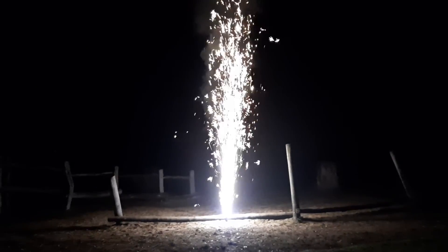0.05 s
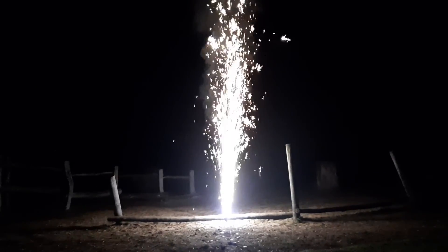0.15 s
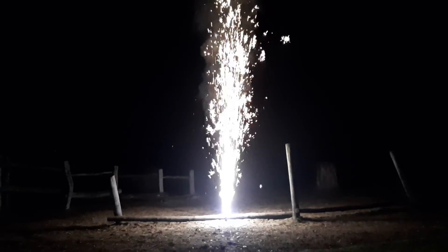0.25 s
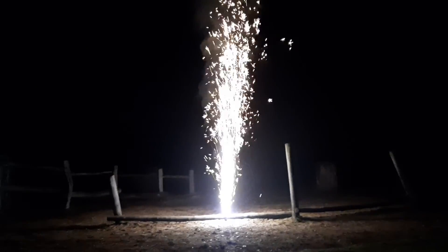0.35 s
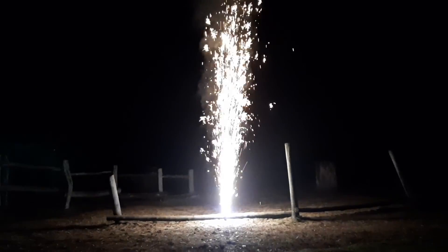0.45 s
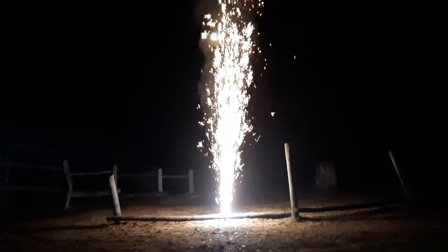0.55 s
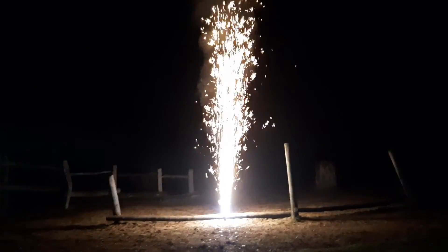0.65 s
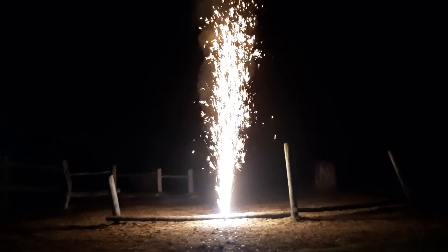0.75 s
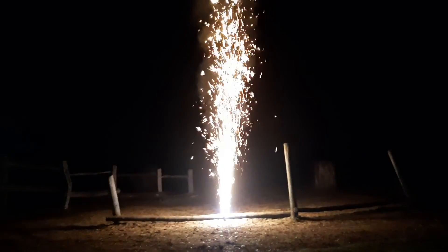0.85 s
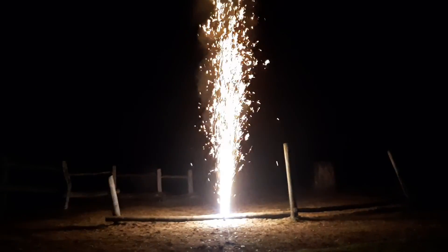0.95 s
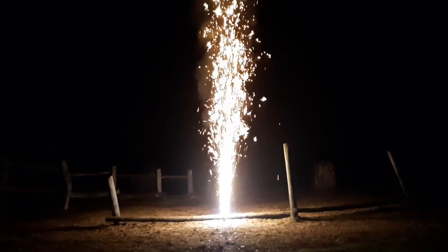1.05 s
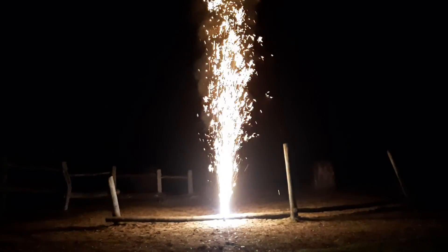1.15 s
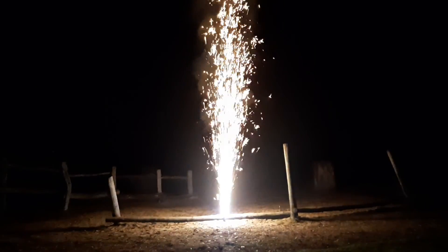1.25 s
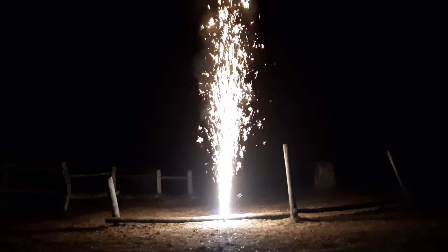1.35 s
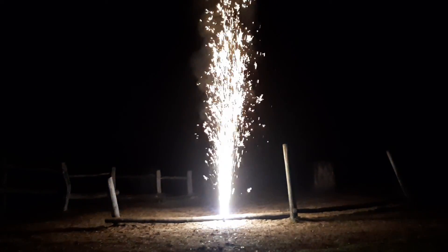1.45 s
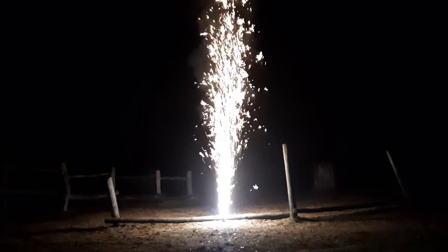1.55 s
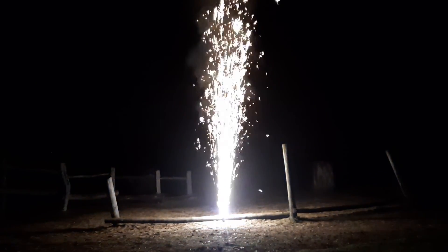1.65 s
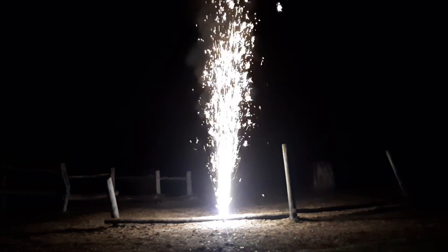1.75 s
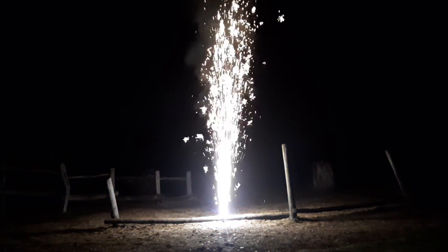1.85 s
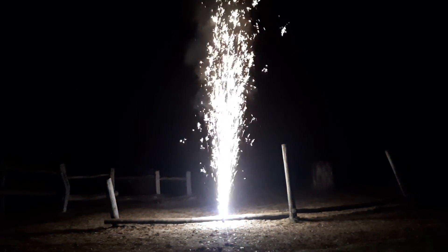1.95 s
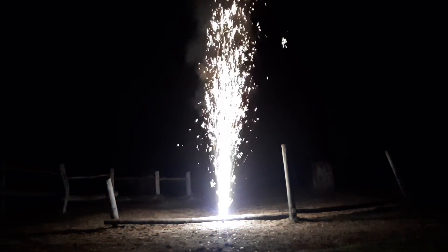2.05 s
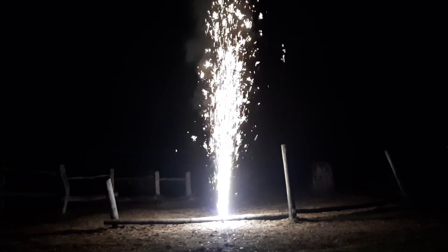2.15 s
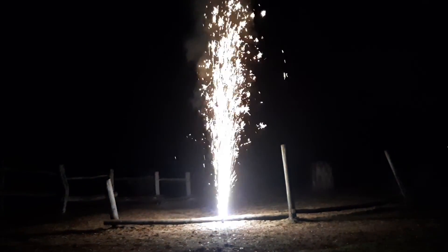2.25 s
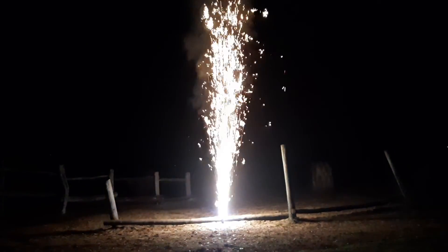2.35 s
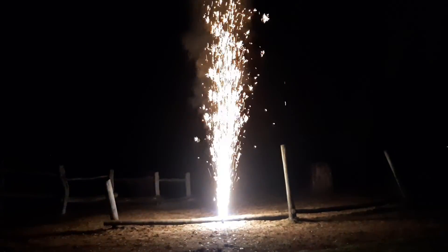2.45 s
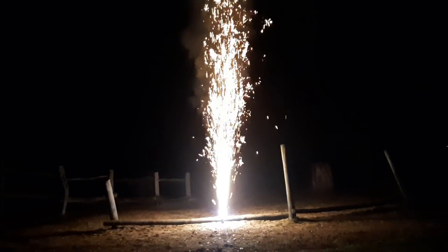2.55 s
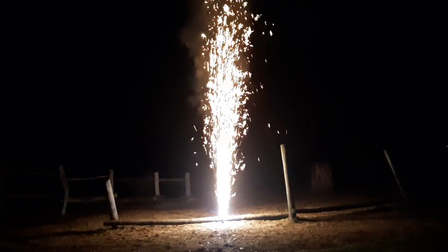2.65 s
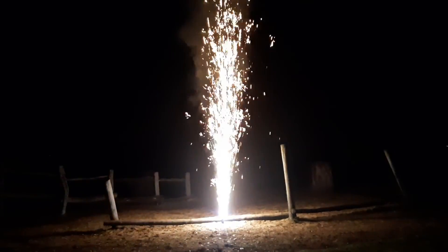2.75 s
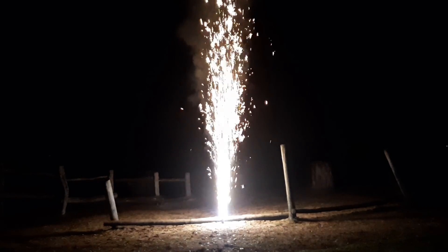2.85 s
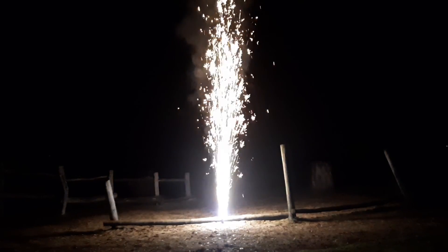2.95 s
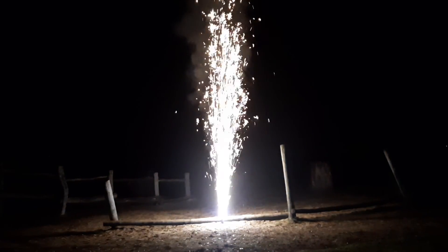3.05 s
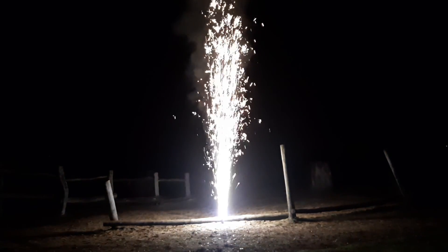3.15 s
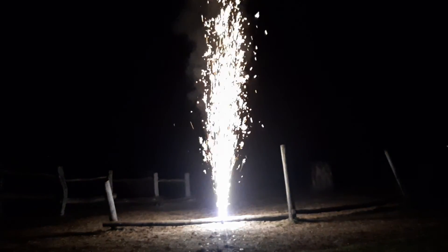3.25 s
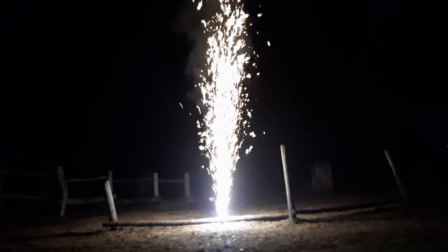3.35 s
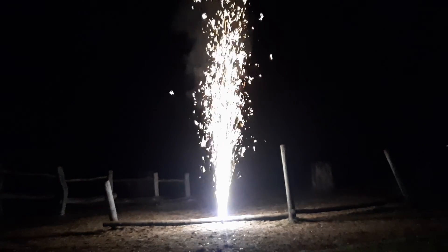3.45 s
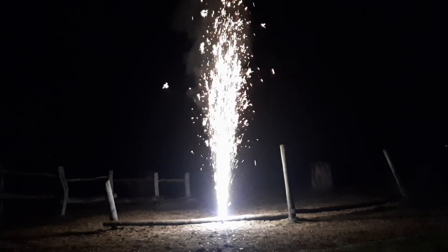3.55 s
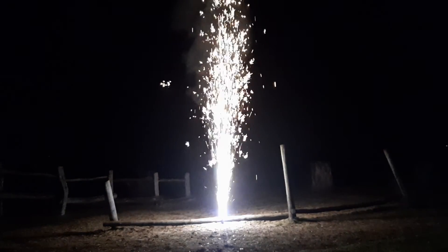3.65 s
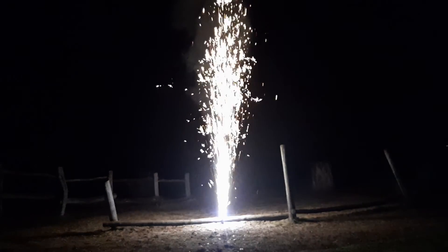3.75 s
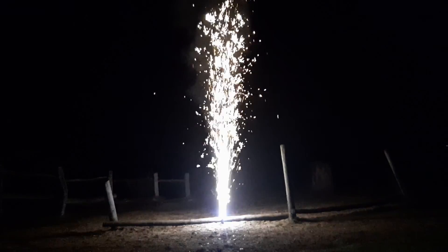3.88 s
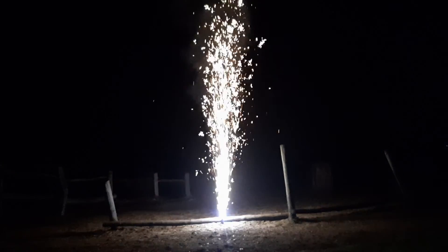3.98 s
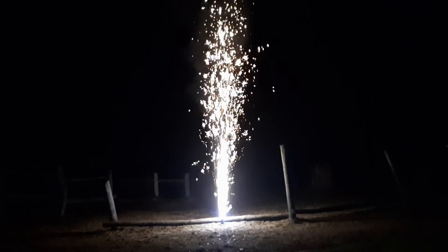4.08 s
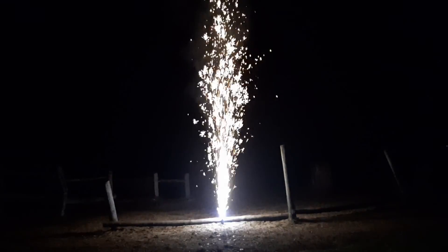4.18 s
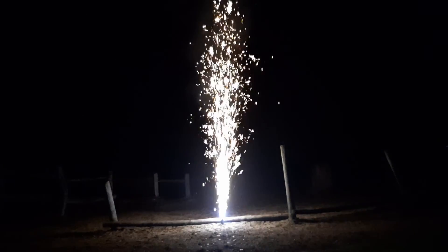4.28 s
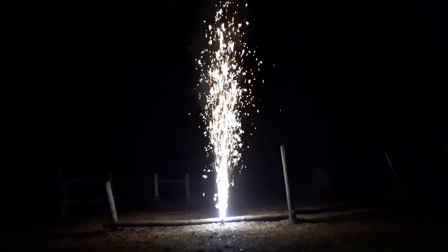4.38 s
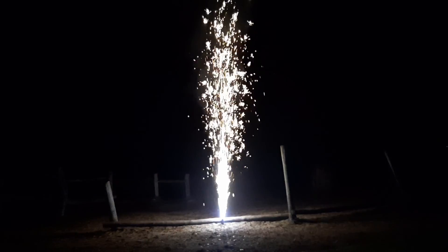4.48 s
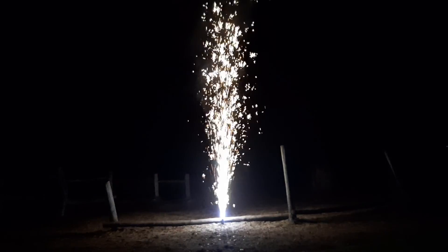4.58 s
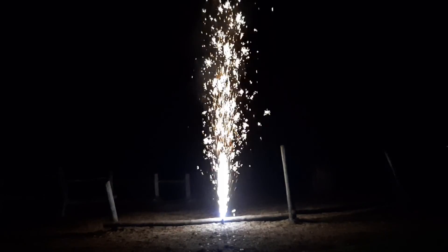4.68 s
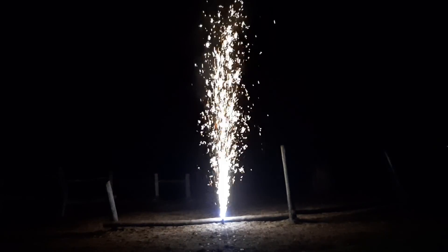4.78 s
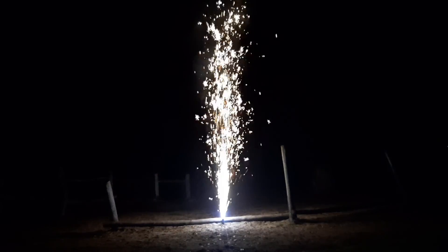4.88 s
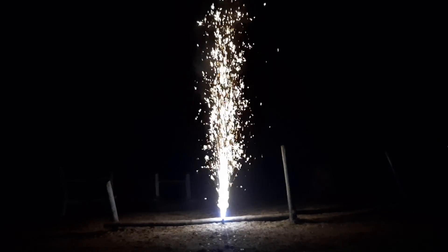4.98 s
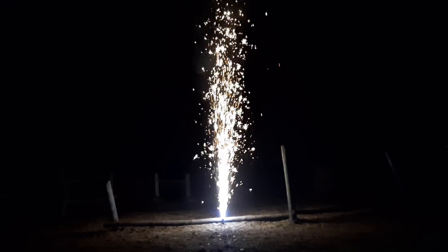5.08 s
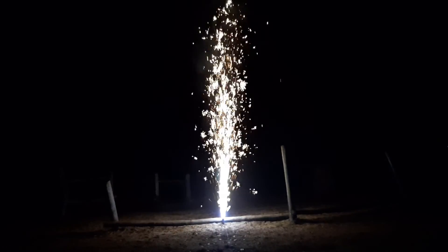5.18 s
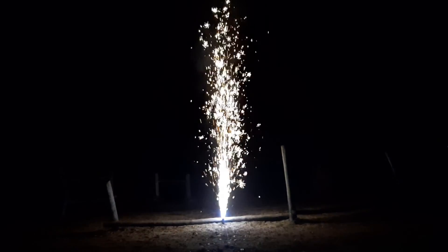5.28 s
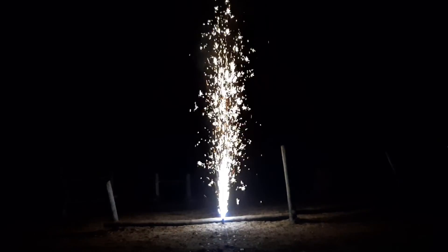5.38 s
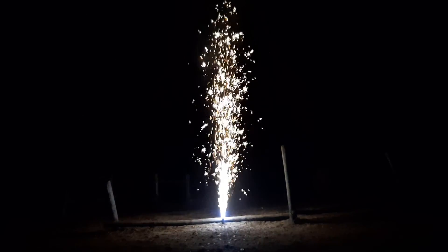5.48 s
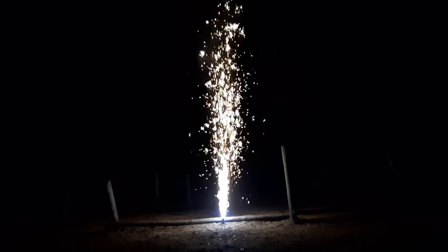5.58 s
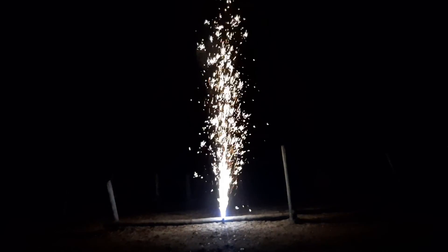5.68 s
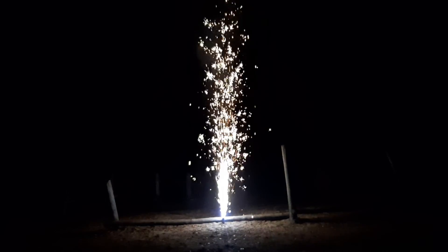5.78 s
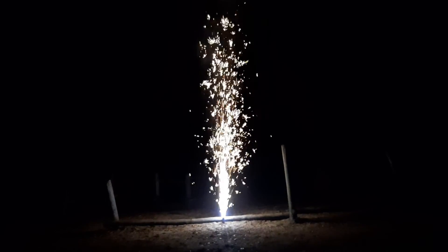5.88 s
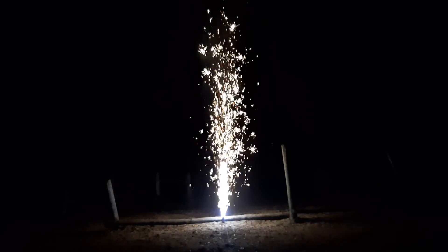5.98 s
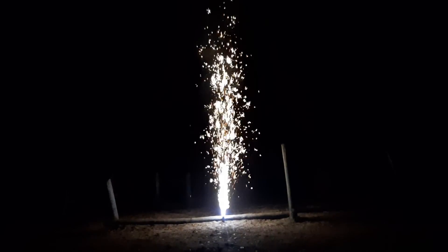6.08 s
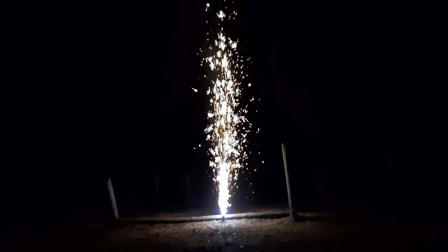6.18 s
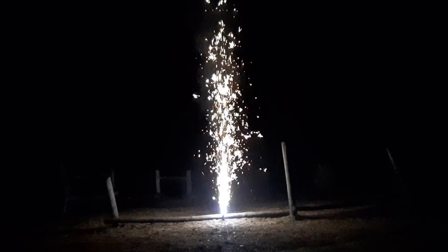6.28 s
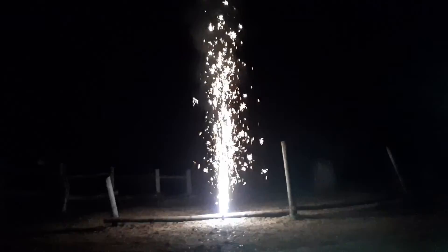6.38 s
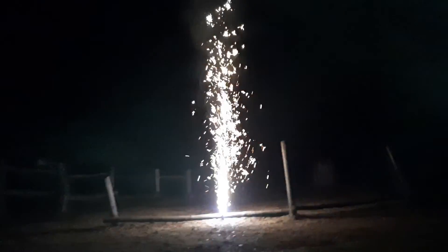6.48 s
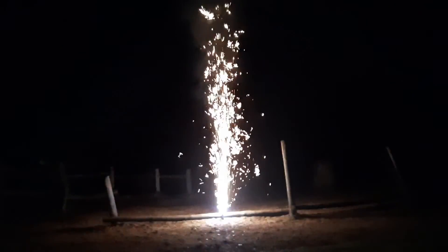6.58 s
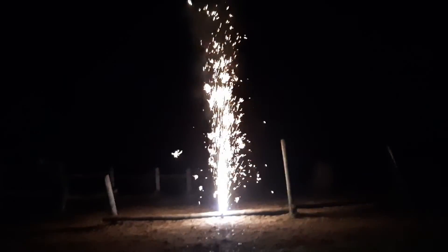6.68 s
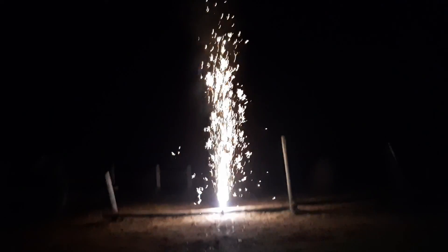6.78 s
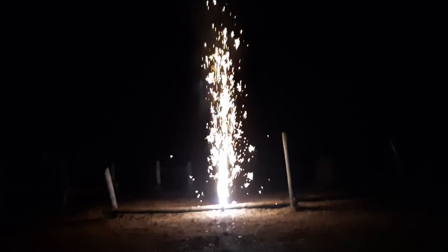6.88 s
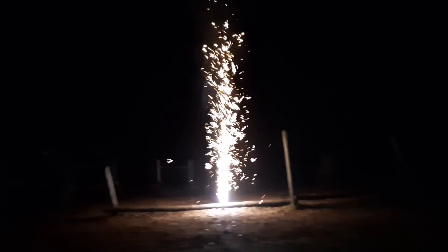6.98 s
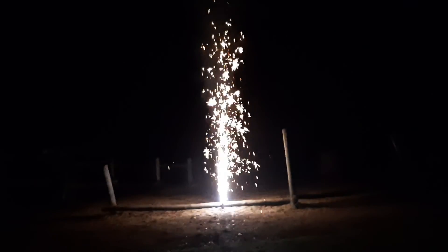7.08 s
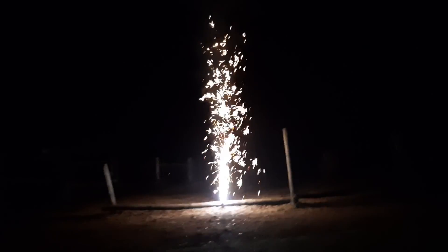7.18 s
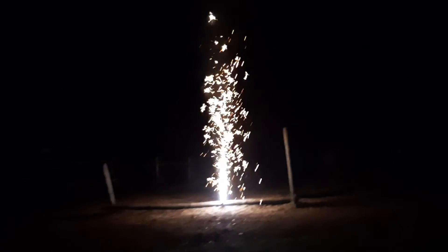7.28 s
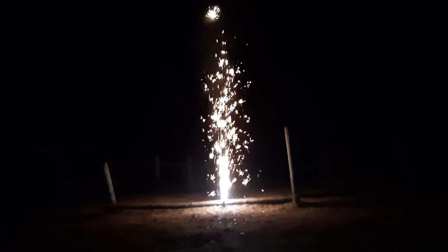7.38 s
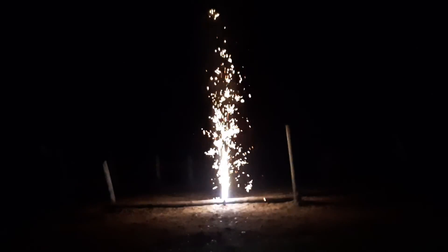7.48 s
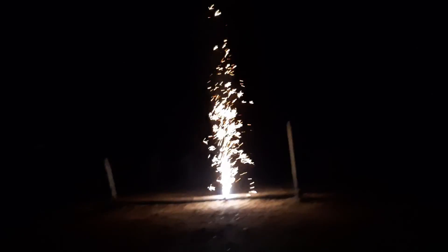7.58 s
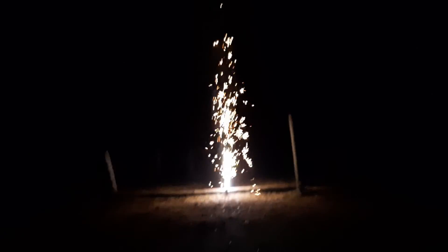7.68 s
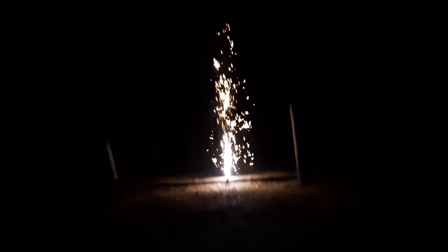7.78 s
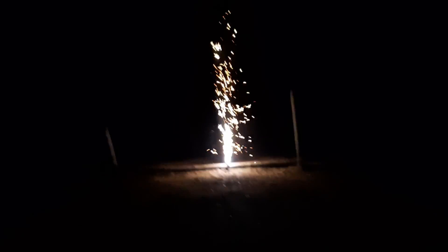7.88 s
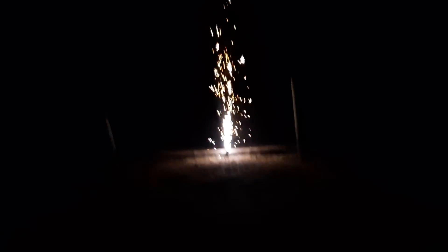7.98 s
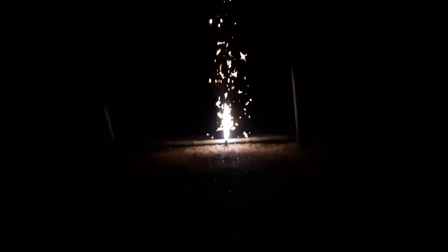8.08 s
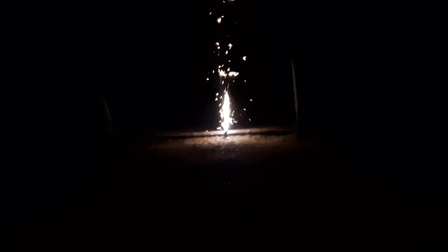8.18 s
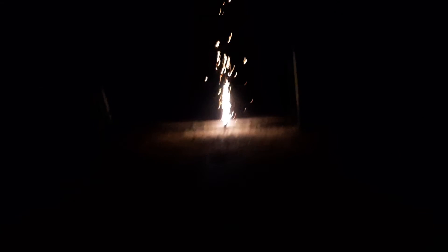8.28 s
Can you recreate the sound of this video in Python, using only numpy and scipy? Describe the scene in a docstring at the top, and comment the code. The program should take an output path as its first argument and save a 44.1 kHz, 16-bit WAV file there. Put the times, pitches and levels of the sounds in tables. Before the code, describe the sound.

Close, broad rushing hiss of a spark fountain over a low flame roar, holding strong about four seconds, then gradually fading with tiny pops.

```python
"""The jet of a ground firework fountain hisses near full pressure for about four seconds, then weakens and dulls.
It is filtered noise that follows the gas pressure, with a short echo from the ground.
Sparks sizzle above it as random clicks, a low noise band is the roar of the flame, and noise bursts are
late pops and soft bumps. A phone hears it a few metres away: its two microphone ports, and the hand
shifting around them, colour the left and right channels."""
import sys
import numpy as np
from scipy import signal
from scipy.fft import rfft, irfft
from scipy.io import wavfile
from scipy.ndimage import uniform_filter1d

SR = 44100
rng = np.random.default_rng(int(sys.argv[2]) if len(sys.argv) > 2 else 0)


def transcribe(u):
    """Save the signal u as a 16-bit wav file named by the first command-line argument.

    u: samples, shape (n,) or (channels, n), limited to [-1, 1]; the rate is SR.
    q: integer samples, one column per channel.
    """
    v = np.clip(np.atleast_2d(u).T, -1, 1)
    q = np.round(v * 32767).astype(np.int16)
    wavfile.write(sys.argv[1], SR, q)


N = 367347
TIME = np.arange(N) / SR  # seconds
BINS = np.arange(N // 2 + 1) * SR / N  # Hz, for filters over the whole sound


def undb(db):
    """Turn decibels into gain."""
    return 10 ** (np.asarray(db) / 20)


def contour(points, hz=BINS):
    """Join points with straight lines, with frequency on a logarithmic scale."""
    point_hz, value = np.transpose(points)
    return np.interp(np.log(hz + 1), np.log(point_hz), value)


def bell(hz, centre_hz, width_hz):
    """Give the shape of a resonance: 1 at its centre, half as high at half its width away."""
    return 1 / (1 + (2 * (hz - centre_hz) / width_hz) ** 2)


def filtered(x, gain):
    """Apply a steady filter, given by its gain at every frequency."""
    return irfft(rfft(x) * gain, N)


def moving_filter(x, gain_at, size=2048):
    """Filter short overlapping slices, with a gain that depends on frequency and time."""
    hz, s, frames = signal.stft(x, SR, nperseg=size)
    changed = frames * gain_at(hz[:, None], s)
    return signal.istft(changed, SR, nperseg=size)[1][..., :N]


def walk(rate):
    """Wander smoothly around 0, typically by about 0.5, with rate new random values per second."""
    hold = max(int(SR / rate), 2)  # samples
    steps = np.repeat(rng.standard_normal(N // hold + 1), hold)
    smooth = uniform_filter1d(uniform_filter1d(steps, hold), hold)
    return 0.65 * smooth[:N]


def burst(start, decay_s):
    """Jump up at the start and die away."""
    return (TIME >= start) * np.exp(-np.abs(TIME - start) / decay_s)


def at_ports(pair, focus):
    """Mix two unrelated signals into left and right; a compact source (focus 1) is most alike in both."""
    # Each row: frequency in Hz, likeness of left and right from 0 to 1 before focus scales it.
    likeness_points = [(50, 0.93), (200, .99), (1000, 1), (1700, 0.93), (3000, 0.9), (4500, 0.89),
                       (7200, 0.86), (10000, 0.8), (15000, 0.86)]
    left_lead_s = 1.3e-5  # the sound reaches the left port slightly sooner
    likeness = np.clip(contour(likeness_points) * focus, 0, .999)
    shares = np.sqrt([(1 + likeness) / 2, (1 - likeness) / 2])
    mid, side = rfft(pair) * shares
    turn = np.exp(1j * np.pi * BINS * left_lead_s)  # half of the lead on each side
    return irfft(np.array([(mid + side) * turn, (mid - side) / turn]), N)


def pressure(s):
    """Gas pressure holds near 1, then falls evenly to a last trickle, with surges and sags on the way."""
    # The charge burns unevenly.
    # Each row: time in seconds, half width in seconds, rise as a share of the pressure.
    surges = [(.2, 0.74, 0.13), (3.6, 0.35, 0.24), (6.57, 0.11, 0.074), (7.1, 0.097, 0.074),
              (7.45, 0.16, -0.062), (7.95, .1, 0.0063)]
    fade_s, spent_s, last_pressure = 3.15, 8.62, 0.085
    falling = np.clip((spent_s - s) / (spent_s - fade_s), last_pressure, 1)
    uneven = sum(rise * np.exp(-((s - at) / width) ** 2) for at, width, rise in surges)
    return falling * (1 + uneven)


def spread(s):
    """The weakened jet spreads out, from 0 to 1."""
    spreads_s, spreading_s = 6.65, 0.32  # when it begins and how long it takes
    return np.clip((s - spreads_s) / spreading_s, 0, 1)


def bumps(width_hz=85, decay_s=.03):
    """Soft low bumps near the end: narrow bands of noise that die away quickly."""
    # Each row: start in seconds, level in dB at the start, centre frequency in Hz.
    bump_table = [(8.232, -40, 150), (8.266, -41, 62)]
    out = 0
    for start, db, centre_hz in bump_table:
        thud = filtered(rng.standard_normal(N), bell(BINS, centre_hz, width_hz))
        out = out + undb(db) * burst(start, decay_s) * thud / thud.std()
    return out


def pops(gain_db=-7, decay_s=.0012):
    """Larger single sparks burst with a short dry snap once the hiss has thinned."""
    # Each row: start in seconds, level in dB before the shared gain and colouring.
    pop_table = [(6.9574, -23), (7.3004, -25), (7.3784, -31), (7.5194, -31), (7.6258, -37), (7.8514, -36),
                 (8.0336, -36), (8.1027, -45), (8.1224, -42), (8.1784, -42), (8.2015, -42), (8.2307, -41),
                 (8.2469, -40), (8.2738, -41)]
    # Each row: frequency in Hz, gain in dB.
    pop_colour = [(300, -12), (2000, -6), (5000, 5), (8500, -12), (11500, -6), (15500, -1)]
    snaps = sum(undb(db + gain_db) * burst(s, decay_s) for s, db in pop_table)
    noise = snaps * rng.standard_normal((2, N))
    return at_ports(filtered(noise, undb(contour(pop_colour))), .7)


def roar():
    """The flame roars low and surges a little; as it gutters, the upper part fades first."""
    # Spectrum of the roar. Each row: frequency in Hz, gain in dB.
    roar_colour = [(40, -41.5), (80, -34.5), (130, -30), (170, -26), (240, -24), (315, -28), (385, -20.7),
                   (450, -22.5), (525, -30), (700, -36), (950, -33), (1500, -31.5), (2400, -72)]
    roar_db, surge_db = 0.37, 0.7
    gutters_s, gutter_db_per_s, gutter_hz = 7.53, 15.5, 330  # the fade rate is approached above gutter_hz

    def gutter(hz, s):
        fade_db = gutter_db_per_s * np.maximum(s - gutters_s, 0)
        upper_share = hz ** 2 / (hz ** 2 + gutter_hz ** 2)
        return undb(-fade_db * upper_share)

    flame = rng.standard_normal((2, N)) * undb(roar_db + surge_db * walk(10))
    coloured = filtered(flame, undb(contour(roar_colour)))
    return at_ports(moving_filter(coloured, gutter), 0.98)


def grains(rate):
    """Two trains of tiny clicks of random size, rate per second, each of unit power."""
    chance = np.clip(rate / SR, 1e-4, 1)  # of a click at each sample
    clicks = (rng.random((2, N)) < chance) * rng.standard_normal((2, N))
    return clicks / np.sqrt(chance)


def sparks(pressure_db):
    """Burning metal grains sizzle in flurries along the plume; fewer fly as the charge runs out."""
    # Spectrum of the sizzle. Each row: frequency in Hz, gain in dB.
    spark_colour = [(800.0, -56), (2500.0, -56), (6000.0, -38.5), (9000.0, -52), (11500.0, -36),
                    (15500.0, -39)]
    full_db, power, last_db = 3.5, 1.46, -25  # a few sparks still fly at the very end
    rate_at_0_db, thinning, flurry_db = 24000, .7, 1.0  # clicks per second; dB of rate per dB of level
    spark_db = np.maximum(full_db + power * pressure_db, last_db)
    clicks = grains(rate_at_0_db * undb(thinning * spark_db))
    sizzle = clicks * undb(spark_db + flurry_db * walk(70))
    return at_ports(filtered(sizzle, undb(contour(spark_colour))), 1.0)


def jet(pressure_db):
    """Turbulent gas leaves the nozzle; the slower it flows, the quieter and duller its hiss."""
    # Spectrum of the jet. Each row: frequency in Hz, gain in dB.
    jet_colour = [(150.0, -50), (570.0, -26.5), (690.0, -23), (950.0, -21), (1300.0, -18), (1800.0, -18),
                  (3000.0, -17.5), (4500.0, -20.5), (6500.0, -24.5), (7700.0, -28), (9500.0, -38),
                  (11500.0, -46), (15500.0, -45.4)]
    full_db, power = -0.43, 0.46
    corner_hz, corner_power = 12900, 1.57  # above this corner the hiss falls off; it sinks with pressure
    flutter_db, sputter_db = 0.8, 0.9  # slow and fast random level changes
    echo_share, echo_lag_s, echo_top_hz = 0.12, 0.00199, 2930

    def dulling(hz, s):
        corner = corner_hz * pressure(s) ** corner_power
        return 1 / np.sqrt(1 + (hz / corner) ** 2)

    level_db = full_db + power * pressure_db + flutter_db * walk(14) + sputter_db * walk(130)
    gas = rng.standard_normal((2, N)) * undb(level_db)
    # The bounce off the soil comes 2 ms late, loses treble and vanishes as the jet spreads out.
    bounce = np.exp(-2j * np.pi * BINS * echo_lag_s) / (1 + (BINS / echo_top_hz) ** 2)
    echo = echo_share * (1 - spread(TIME)) * filtered(gas, bounce)
    coloured = filtered(gas + echo, undb(contour(jet_colour)))
    return at_ports(moving_filter(coloured, dulling), 0.96)


def scene():
    """Jet and sparks follow the pressure; the roar lasts until the flame gutters."""
    pressure_db = 20 * np.log10(pressure(TIME))
    return bumps() + pops() + roar() + sparks(pressure_db) + jet(pressure_db)


def port(hz, s, resonances):
    """Gain in dB of one port's peaks and dips, with those heard alike left and right."""
    # Peaks and dips heard alike left and right, from reflections nearby and the ports.
    # Each row: centre in Hz, width in Hz, height in dB before the flattening below.
    heard_alike = [(602, 26, 3.5), (683, 74, -5), (990, 42, 4), (1032, 16, -4), (1536, 35, 6.5),
                   (1835, 44, -8), (2060, 113, 3), (2490, 85, 3.5), (2710, 160, -2.5), (2850, 105, 3),
                   (3435, 110, 4), (8476, 720, -28.5)]
    blur, ripple_hz, ripple_width_hz = 0.59, 2450, 1400
    # As the jet spreads out, the peaks and dips flatten, most of all around ripple_hz.
    depth = 1 - blur * spread(s) * bell(hz, ripple_hz, ripple_width_hz)
    return depth * sum(db * bell(hz, centre_hz, width_hz)
                       for centre_hz, width_hz, db in [*resonances, *heard_alike])


def hollow(hz, grip, resonances):
    """Gain in dB of the hollow of the hand: its peaks and notches slide as the grip changes."""
    total = 0
    for width_hz, *poses in resonances:
        centres, heights = poses[::2], poses[1::2]
        centre_hz = np.interp(grip, np.arange(len(centres)), centres)
        db = np.interp(grip, np.arange(len(heights)), heights)
        total = total + db * bell(hz, centre_hz, width_hz)
    return total


def ringing(gain):
    """Give gains (port, frequency, time) the phase of real resonances, which ring only after being struck."""
    cepstrum = irfft(np.log(gain), axis=1)
    half = cepstrum.shape[1] // 2
    phase = 2 * rfft(cepstrum[:, :half], 2 * half, axis=1).imag
    return gain * np.exp(1j * phase)


def ports(hz, s):
    """Response heard at the left and right ports, each with the hand around it."""
    # The hand around each end of the phone. Each row: time in seconds, grip at the left port,
    # grip at the right port (0 open, 1 loose, 2 cupped, 3 tight).
    grip_table = [(0, 1.22, 1.22), (.68, 1.3, 1.25), (.84, 1.96, 2), (1, 2.95, 2.13), (1.17, 2.95, 2.9),
                  (1.8, 2.9, 2.9), (2.03, 3, 2), (2.3, 1.9, 1.96), (2.62, 1.82, 1.75), (2.82, 2.7, 3),
                  (3.15, 2.82, 3), (3.38, 2.26, 2.1), (3.55, 1.9, 1.96), (3.85, 1.2, 1.1), (6.35, 1, .95),
                  (6.52, 1.15, .85), (6.6, .2, .45), (6.95, 0, 0)]
    # Peaks and dips heard at one port. Each row: centre in Hz, width in Hz, height in dB before any flattening.
    left_port = [(1100, 970, -4.5), (1700, 80, 2.1), (3010, 330, 1.0), (3540, 210, 2.0), (4380, 220, 3.7),
                 (6820, 80, 1.9), (7300, 140, 1.0), (10860, 820, 1.8)]
    right_port = [(1588, 236, 6), (1850, 73, 0.5), (4290, 220, 5.5), (4710, 380, 3), (6080, 2200, 7.5),
                  (6200, 98, -8.5), (6620, 130, -3.5), (7030, 130, -1.5), (13630, 950, 3)]
    # Resonances of the hollow of the hand. Each row: width in Hz, then centre in Hz and height in dB
    # for each of the four grips: open, loose, cupped, tight.
    left_hollow = [(630, 1320, -3, 1470, 0.5, 1450, 0.8, 1800, -1.7),
                   (150, 2050, -1, 2040, 3.4, 2090, 5.9, 2050, 4),
                   (400, 2440, -3, 2850, -14, 2210, -11.5, 2240, -3.5),
                   (940, 2300, 1.2, 3460, 2.5, 2920, 5.5, 2000, -0.5),
                   (220, 3200, 5, 3040, 3.5, 3000, -2, 2950, -0.5),
                   (140, 3300, -3.6, 3140, -0.7, 3490, -1, 3460, -2.3),
                   (140, 6900, 1, 6860, -4, 3870, -3.3, 3680, -8),
                   (170, 3600, -2.1, 4020, 4.5, 3950, 0.5, 4140, -2),
                   (690, 7310, -0.5, 6800, -0.5, 4490, -8, 3400, 3.5),
                   (480, 4900, 2.3, 4900, 1.8, 4700, -1, 4900, 3.7),
                   (2040, 6300, 3.5, 9200, 8.5, 6100, 5, 6100, 2.3)]
    right_hollow = [(220, 1870, 5, 2030, 3, 2000, 4.5, 2070, 3),
                    (100, 2100, -5, 2220, -9.5, 2260, -13, 2200, -5),
                    (130, 2450, -4.5, 2620, -9.5, 2550, -13, 2660, -10),
                    (250, 3000, -0.5, 2840, -0.7, 2780, 7, 2900, 0),
                    (310, 3300, -6.5, 3620, -8.5, 3300, -11.5, 3690, -4.5),
                    (150, 3460, 2, 3760, 4, 3790, 6.5, 4100, -4.1),
                    (280, 4690, -0.5, 4770, 1, 4130, -3.4, 4710, 7),
                    (390, 5160, -3, 4960, -2.9, 6000, 1, 4880, -6),
                    (620, 5800, -0.5, 5600, -0.4, 5690, -0.4, 5900, 1.5)]
    # How far the left port lags at the centre of a notch, in radians: open, loose, cupped, tight.
    notch_lag = (0, 1.9, 0, 1.2)
    notch_hz, notch_width_hz = 2680, 110

    grip_s, left_column, right_column = np.transpose(grip_table)
    left_grip = np.interp(s, grip_s, left_column)
    right_grip = np.interp(s, grip_s, right_column)
    left_db = port(hz, s, left_port) + hollow(hz, left_grip, left_hollow)
    right_db = port(hz, s, right_port) + hollow(hz, right_grip, right_hollow)
    left, right = ringing(undb([left_db, right_db]))
    lag = np.interp(left_grip, np.arange(len(notch_lag)), notch_lag) * bell(hz, notch_hz, notch_width_hz)
    return np.array([left * np.exp(-1j * lag), right])


def record(dry, low_cut_hz=42, top_hz=15800):
    """Ports, hand and nearby reflections colour the sound; the phone cuts the rumble and the very top."""
    coloured = moving_filter(dry, ports)
    rumble_cut = signal.butter(4, low_cut_hz, "high", fs=SR, output="sos")
    top_cut = signal.ellip(12, .1, 80, top_hz, fs=SR, output="sos")
    return signal.sosfilt(top_cut, signal.sosfilt(rumble_cut, coloured))


dry = scene()
out = record(dry)
transcribe(out)
```